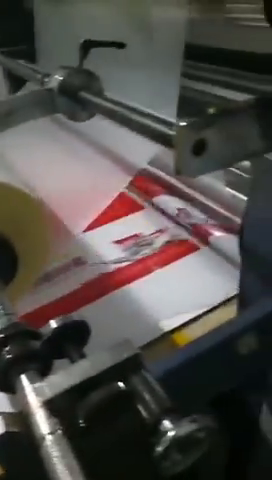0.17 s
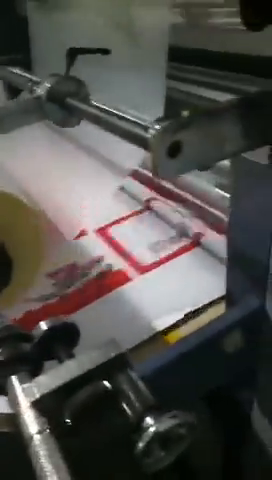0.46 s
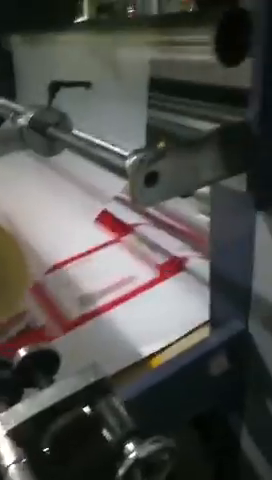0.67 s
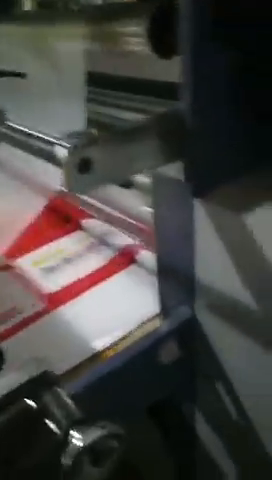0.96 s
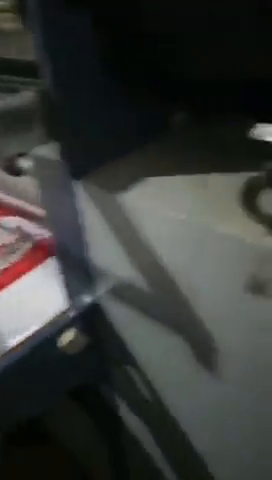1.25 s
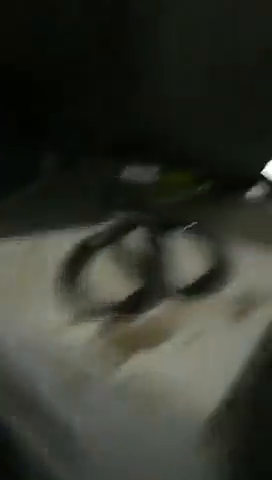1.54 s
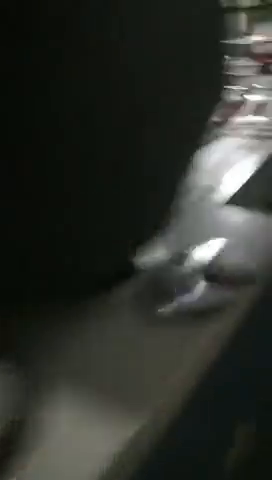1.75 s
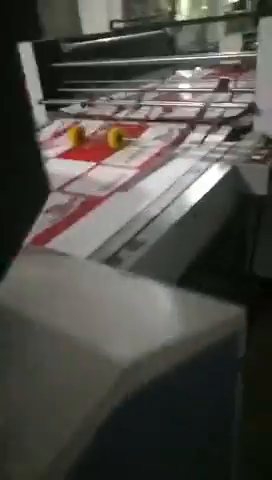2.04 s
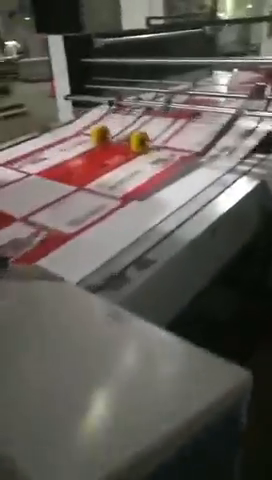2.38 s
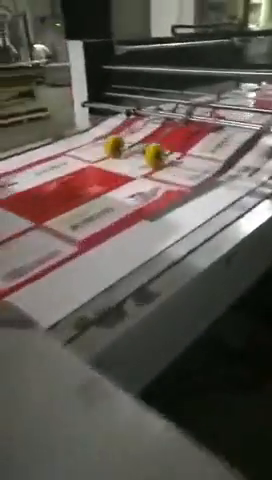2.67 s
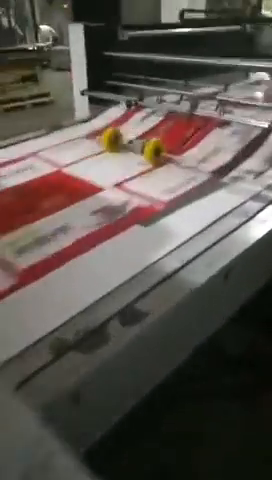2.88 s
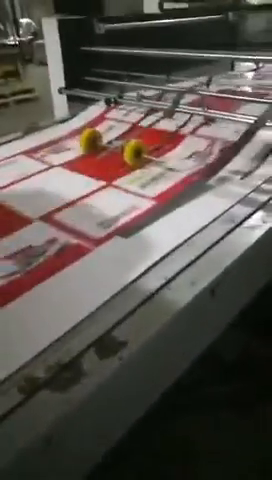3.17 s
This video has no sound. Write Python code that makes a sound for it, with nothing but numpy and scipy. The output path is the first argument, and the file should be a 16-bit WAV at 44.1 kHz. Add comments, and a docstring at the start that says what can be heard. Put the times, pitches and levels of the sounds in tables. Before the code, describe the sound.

Close stereo sound of an industrial sheet feeder, continuous rumble and rolling noise with fluttering paper, suction hiss and swelling motor hum; a faint tap midway, later a loud clack ringing briefly in the hall.

```python
"""Sheet feeder in a large workshop

Heard close by at two ports: filtered noise makes the frame's rumble, the roar of rollers and belts,
the rush of sheets and the surging hiss of suction air. Randomly jolted resonators make loose parts rattle;
sines make the motor hum and gear mesh, and sharp resonances of noise make faint whistles. A light tap,
then a hard clack, are bursts of contacts on damped metal with a dull thud; their clatter rings in the hall."""
import sys
import numpy as np
from scipy import signal
from scipy.fft import rfft, irfft, next_fast_len
from scipy.io import wavfile

SR = 44100
rng = np.random.default_rng(int(sys.argv[2]) if len(sys.argv) > 2 else 0)


def persist_wave(psi):
    """Save psi, clipped to +-1, as 16-bit WAV."""
    counts = np.round(np.clip(psi, -1, 1) * 32767).astype(np.int16)
    wavfile.write(sys.argv[1], SR, np.atleast_2d(counts).T)


N = 145971
FFT_LENGTH = next_fast_len(N, True)
HZ = np.fft.rfftfreq(FFT_LENGTH, 1 / SR) + 1  # 1 Hz up, so that its logarithm exists
CUTOFF_HZ = 7580


def amp(db):
    """Decibel law: 20 dB is a factor of ten in amplitude."""
    return 10 ** (np.asarray(db) / 20)


def rms_one(x):
    """Normalisation: scale to a root mean square of 1."""
    return x / np.sqrt(np.mean(x ** 2) + 1e-20)


def to_hz(x):
    """Fourier analysis: time into frequency."""
    return rfft(x, FFT_LENGTH)


def to_time(x):
    """Fourier synthesis: frequency back into time."""
    return irfft(x, FFT_LENGTH)[..., :N]


def level(rows):
    """Amplitude envelope: gain over time, interpolated in decibels."""
    return amp(np.interp(np.arange(N) / SR, *np.transpose(rows)))


def at_hz(points):
    """Frequency response: gain interpolated in decibels over log frequency."""
    hz, db = np.transpose(points)
    return amp(np.interp(np.log(HZ), np.log(hz), db))


def drift(rate_hz):
    """Slow random modulation: white noise through a two-pole low-pass, scaled to spread 1."""
    step = 40  # samples between drawn values
    r = np.exp(-2 * np.pi * rate_hz * step / SR)
    white = rng.standard_normal(N // step + 2002)
    slow = signal.lfilter([1], [1, -2 * r, r * r], white)[2000:]  # settled part
    return np.interp(np.arange(N) / step, np.arange(len(slow)), rms_one(slow - slow.mean()))


# Stereo width, narrow in the bass: (frequency [Hz], side minus middle [dB])
SIDE_WIDTH = [(60, -40), (100, -57.5), (160, -43), (220, -35), (310, -8.5), (430, 0), (600, 6.5),
              (830, 0.8), (1160, 0), (1600, -2.5), (2230, 2), (3100, -0.5), (4300, 0), (5980, 0),
              (8300, -1)]


def spread(mid, side):
    """Spatial coherence: the two ports agree in the bass and differ above it."""
    side = to_time(to_hz(side) * at_hz(SIDE_WIDTH))
    return np.array([mid + side, mid - side])


def noise(spectrum, shared_db, patchy_db, rate_hz):
    """Modulated noise: half-octave bands flicker partly together, partly alone."""
    in_range = (HZ >= spectrum[0][0]) * (HZ <= spectrum[-1][0])
    coloured = to_hz(rng.standard_normal((2, N))) * at_hz(spectrum) * in_range
    together = drift(rate_hz)
    place = 2 * np.log2(HZ)  # half-octave steps
    lowest = np.floor(2 * np.log2(spectrum[0][0]))
    highest = 2 * np.log2(min(spectrum[-1][0], CUTOFF_HZ))
    out = 0
    for centre in np.arange(lowest, highest + 1):
        share = np.cos(np.pi / 2 * np.clip(place - centre, -1, 1)) ** 2  # neighbours add up to 1
        flicker = amp(shared_db * together + patchy_db * drift(rate_hz))
        out = out + to_time(coloured * share) * flicker
    return spread(*rms_one(out))


def ring(clicks, modes):
    """Modal synthesis: each impulse excites exponentially decaying sine modes."""
    out = 0
    for hz, db, t60 in modes:
        r, w = amp(-60 / (t60 * SR)), 2 * np.pi * hz / SR
        mode = signal.lfilter([0, np.sin(w)], [1, -2 * r * np.cos(w), r * r], clicks + 1e-18)
        out = out + amp(db) * mode
    return out


# Frame and floor spectrum: (frequency [Hz], relative density [dB per Hz])
RUMBLE_SPECTRUM = [(12, -43), (20, -5), (38, -3), (75, -0.5), (118, 2), (172, 1), (299, 0.5), (414, -10),
                   (464, -10), (513, -19), (600, -25.5), (780, -34), (1320, -120)]
# Rumble envelope: (time [s], level [dB])
RUMBLE_ENVELOPE = [(0.0, -25.5), (0.11, -22.5), (0.41, -24), (0.94, -23), (1.55, -22.5), (2.27, -22.5),
                   (2.77, -25), (3.31, -24.5)]


def rumble():
    """Structure-borne sound: frame and floor give low, nearly steady noise."""
    return level(RUMBLE_ENVELOPE) * noise(RUMBLE_SPECTRUM, shared_db=0.1, patchy_db=-0.23, rate_hz=6.2)


# Loose rods and guards; level relative to the rollers
RATTLES_PER_S, RATTLE_T60_S, RATTLE_DB, RATTLE_TILT_DB_PER_OCTAVE = 400, 0.073, -5, -2
RATTLE_LOW_HZ, RATTLE_HIGH_HZ = 198.5, 7000


def rattle():
    """Random impact excitation: jolted loose parts each ring briefly at their own pitch."""
    parts = 40
    strength = amp(3.3 * np.minimum(rng.exponential(1, (2, N)), 4))
    jolts = (rng.random((2, N)) < RATTLES_PER_S / SR) * strength
    pitches = np.geomspace(RATTLE_LOW_HZ, RATTLE_HIGH_HZ, num=parts) * rng.uniform(.97, 1.03, size=parts)
    struck_part = rng.integers(0, parts, size=(2, N))
    out = 0
    for k, hz in enumerate(pitches):
        db = RATTLE_TILT_DB_PER_OCTAVE * np.log2(hz / RATTLE_LOW_HZ)
        out = out + ring(jolts * (struck_part == k), [(hz, db, RATTLE_T60_S)])
    soft = signal.sosfilt(signal.butter(1, RATTLE_HIGH_HZ, fs=SR, output="sos"), out)
    return amp(RATTLE_DB) * spread(*rms_one(soft))


# Roller, belt and sheet spectrum: (frequency [Hz], relative density [dB per Hz])
ROLLER_SPECTRUM = [(240, -32), (400, -11.5), (641, -2.5), (943, -3), (1780, -3.5), (2140, -7), (3030, -8.5),
                   (6010, -16.5), (6890, -13.5), (7800, -18.5), (10100, -33.5), (17200, -120)]
# Envelope of rollers and rattle: (time [s], level [dB])
ROLLER_ENVELOPE = [(0.0, -26), (0.35, -28), (.55, -27.5), (0.65, -26), (1.0, -27), (1.25, -27), (1.8, -28),
                   (2.2, -28), (2.43, -27.5), (2.75, -29.5), (3.1, -29), (3.31, -28.5)]


def rollers():
    """Rolling noise: a broadband roar shares its envelope with the loose parts."""
    roar = noise(ROLLER_SPECTRUM, shared_db=0.5, patchy_db=0.85, rate_hz=30)
    return level(ROLLER_ENVELOPE) * (roar + rattle())


# Sliding sheet spectrum: (frequency [Hz], relative density [dB per Hz])
SHEET_SPECTRUM = [(1500, -17), (2200, -5), (3000, 0.5), (4000, -2), (5500, -16.5)]
# Sheet envelope: (time [s], level [dB])
SHEET_ENVELOPE = [(0, -39.5), (.5, -36), (.64, -33), (.9, -32.5), (1.2, -33), (1.6, -46), (2.2, -44.5),
                  (2.7, -48), (3.31, -39)]


def sheets():
    """Friction noise: sliding sheets give a fluttering band of treble."""
    return level(SHEET_ENVELOPE) * noise(SHEET_SPECTRUM, shared_db=1.0, patchy_db=1.5, rate_hz=33)


# Suction hiss spectrum: (frequency [Hz], relative density [dB per Hz])
AIR_SPECTRUM = [(1200, -29.5), (2500, -2.5), (4000, 6.5), (5500, 5.5), (7000, 2), (8000, 6.5)]
# Air surges: (time [s], level [dB])
AIR_ENVELOPE = [(0, -38.5), (.36, -32.5), (.5, -37.5), (.62, -31.5), (.7, -30.5), (.95, -31), (1.12, -32.5),
                (1.3, -35.5), (1.6, -33.5), (1.7, -29.5), (1.85, -32.5), (1.93, -24.5), (2.05, -28),
                (2.2, -31), (2.45, -37.5), (2.8, -36.5), (2.9, -28.5), (3.18, -31), (3.23, -34.5),
                (3.27, -28), (3.31, -31.5)]


def air():
    """Turbulent flow noise: suction air hisses in surges."""
    return level(AIR_ENVELOPE) * noise(AIR_SPECTRUM, shared_db=1.55, patchy_db=1.33, rate_hz=19)


PATCH_HZ, PATCH_S = 110, .04  # size of a patch
HOLLOW_FROM = .6  # hollows open where chance falls this many spreads low
# Patch contrast: (frequency [Hz], swing [dB], depth of the hollows [dB])
PATCH_CONTRAST = [(100, .5, 1), (350, .7, 3), (480, 1, 14), (750, 1, 16), (1000, 1, 7), (1700, 1, 8),
                  (2500, 1, 14), (3300, 1, 8), (4300, 1, 10), (5500, 1, 6), (7500, .7, 2)]


def patchy(x):
    """Time-frequency modulation: narrow patches swell and hollow apart in middle and side."""
    window = dict(nperseg=1024, noverlap=768)
    hz, t, z = signal.stft([x[0] + x[1], x[0] - x[1]], SR, **window)
    field = rng.standard_normal(z.shape)
    for size, axis in [(PATCH_HZ / hz[1], 1), (PATCH_S / t[1], 2)]:  # smooth along frequency, then time
        bell = np.exp(-2 * (np.arange(-30, 31) / size) ** 2)
        field = signal.fftconvolve(field, np.expand_dims(bell, (0, 3 - axis)), "same", axes=axis)
    field = rms_one(field)
    at, *columns = np.transpose(PATCH_CONTRAST)
    swing_db, hollow_db = (np.interp(np.log(hz + 1), np.log(at), c)[:, None] for c in columns)
    hollow = np.maximum(-field - HOLLOW_FROM, 0) ** 2
    z = z * amp(swing_db * field - hollow_db * hollow)
    mid, side = signal.istft(z, SR, **window)[1][:, :N] / 2
    return np.array([mid + side, mid - side])


MOTOR_HZ, MOTOR_WANDER_RAD = 114.4, 0.58
# Motor harmonics: (multiple of MOTOR_HZ, level relative to the envelope [dB])
MOTOR_HARMONICS = [(1, -2.5), (2, -10)]
# Motor envelope: (time [s], level [dB])
MOTOR_ENVELOPE = [(0.0, -39.5), (0.05, -37), (0.64, -21.5), (0.8, -41), (0.84, -25.5), (1.05, -43),
                  (1.4, -26.5), (1.75, -34), (1.95, -19.5), (2.21, -45), (2.48, -26), (2.66, -44),
                  (2.86, -26), (2.89, -47), (3.05, -31), (3.31, -51)]


def motor():
    """Harmonic series: a swelling hum whose phase wanders slowly."""
    wander = MOTOR_WANDER_RAD * drift(4.6)
    phase = 2 * np.pi * MOTOR_HZ * np.arange(N) / SR + wander
    hum = sum(amp(db) * np.sin(k * phase) for k, db in MOTOR_HARMONICS)
    return hum * np.sqrt(2) * level(MOTOR_ENVELOPE)


GEAR_HZ = 316.3
# Gear mesh: (multiple of GEAR_HZ, middle level [dB])
GEAR_HARMONICS = [(2, -51), (3, -44), (5, -46)]


def gears():
    """Tooth-mesh tones: harmonics with slight drifts of level and phase."""
    t, out = np.arange(N) / SR, 0
    for k, db in GEAR_HARMONICS:
        gain = amp(db + 2.0 * drift(2.4))
        cycles = k * GEAR_HZ * t + rng.random((2, 1)) + 0.036 * drift(1.5)
        out = out + gain * np.sin(2 * np.pi * cycles)
    return out


# Whistling air edges: (frequency [Hz], level [dB], width at half amplitude [Hz])
AIR_EDGES = [(3646, -49.5, 76), (4700, -52, 26), (5820, -49.5, 29)]


def narrow(hz, width_hz):
    """Resonance: noise through a narrow peak becomes a wavering tone."""
    shape = 1 / (1 + (2 * (HZ - hz) / width_hz) ** 2)
    return rms_one(to_time(to_hz(rng.standard_normal((2, N))) * shape))


def whistles():
    """Edge tones: air edges whistle faintly as narrow resonances of noise."""
    return sum(amp(db) * narrow(hz, width) for hz, db, width in AIR_EDGES)


CONTACTS_PER_S, THUD_LAG_S = 6000, .037
# Tap, then a clack in two parts: (time [s], clatter level [dB], clatter length [s], thud level [dB])
KNOCK_EVENTS = [(1.327, -25, 0.021, -42), (2.247, -27.5, 0.023, -36), (2.259, -20, 0.038, -19.4)]
# Damped metal modes: (frequency [Hz], level [dB], 60 dB decay time [s])
METAL_MODES = [(486, -9.5, .013), (685, -12.5, .012), (1130, -12, 0.0066), (1630, -6.5, 0.0056),
               (2175, -3.5, 0.0066), (2300, -12, 0.0026), (2700, -3.5, 0.0076), (3240, -5.5, 0.0059),
               (3610, -5, 0.0034), (4050, -6, 0.0036), (4730, -7, 0.0057), (5200, -10.5, 0.0065),
               (6640, -5, 0.002)]
# Frame panel modes: (frequency [Hz], level [dB], 60 dB decay time [s])
PANEL_MODES = [(150, 13.5, 0.065), (275, 0.5, 0.11), (322, -7.5, 0.061), (427, -3.5, 0.068)]


def knocks():
    """Impact excitation: swelling bursts of contacts ring metal parts; one push each thuds the frame."""
    t, burst, push = np.arange(N) / SR, np.zeros(N), np.zeros(N)
    for start, clatter_db, length, thud_db in KNOCK_EVENTS:
        progress = np.clip((t - start) / length, 0, 1)
        burst += amp(clatter_db) * np.sin(np.pi * progress ** 0.78) ** 2
        push[int((start + THUD_LAG_S) * SR)] = -amp(thud_db)
    busy = burst > 0
    shape = (2, busy.sum())
    clatter = 0
    for mode in METAL_MODES:  # every mode has its own contacts
        contacts = np.zeros((2, N))
        contacts[:, busy] = (rng.random(shape) < CONTACTS_PER_S / SR) * rng.standard_normal(shape)
        clatter = clatter + ring(contacts * burst, [mode])
    return clatter, ring(push, PANEL_MODES)


HALL_T60_S, HALL_DB, WALL_CUT_HZ = 1, 0.3, 2000


def hall(x):
    """Diffuse reverberation: a dense noise tail, separate in middle and side, dulls as it decays."""
    t = np.arange(SR) / SR
    tail = rng.standard_normal((2, SR))
    dull = signal.sosfilt(signal.butter(1, WALL_CUT_HZ, fs=SR, output="sos"), tail)
    bright = tail - dull
    tail = dull * amp(-60 * t / HALL_T60_S) + bright * amp(-60 * t / (0.7 * HALL_T60_S))
    tail = tail * np.clip(t / 0.0073, 0, 1)  # the echoes build up
    return signal.fftconvolve(x, rms_one(tail) / np.sqrt(SR), axes=1)[:, :N]


def scene():
    """Superposition: all sources add at the two ports."""
    clatter, thuds = knocks()
    roar = patchy(rumble() + rollers() + sheets() + air())
    tones = spread(*(motor() + gears() + whistles()))
    impacts = spread(*(clatter + amp(HALL_DB) * hall(clatter) + thuds))
    return roar + tones + impacts


LEFT_FLAT_HZ, PEAK = 350, .95  # balance is level up to here; amplitude ceiling
# Port balance above the bass: (frequency [Hz], left minus right [dB])
PORT_BALANCE = [(700, 1), (2000, 0.8), (4500, 0), (5500, -0.5), (6200, -4), (7600, -9.5)]


def record(dry):
    """Transducer response: port colour, soft saturation of peaks and a steep top cut."""
    tilt = np.sqrt(at_hz([(LEFT_FLAT_HZ, 0)] + PORT_BALANCE))  # half the difference to each port
    x = to_time(to_hz(dry) * [tilt, 1 / tilt])
    x = x / (1 + np.abs(x / PEAK) ** 4) ** .25
    return signal.sosfilt(signal.ellip(18, .5, 110, CUTOFF_HZ, fs=SR, output="sos"), x)


dry = scene()
out = record(dry)
persist_wave(out)
```